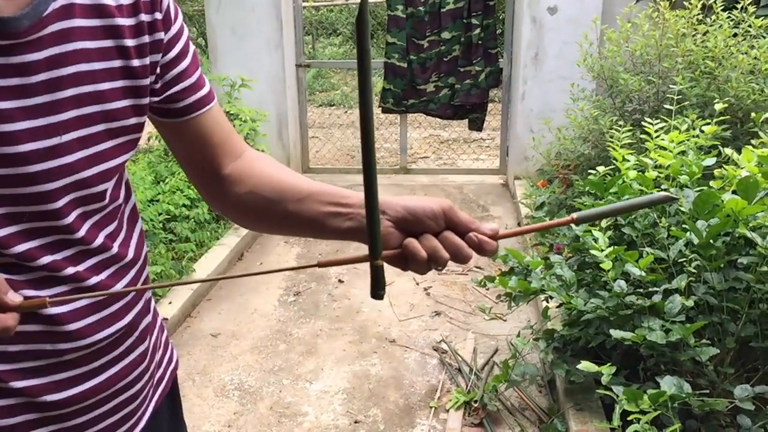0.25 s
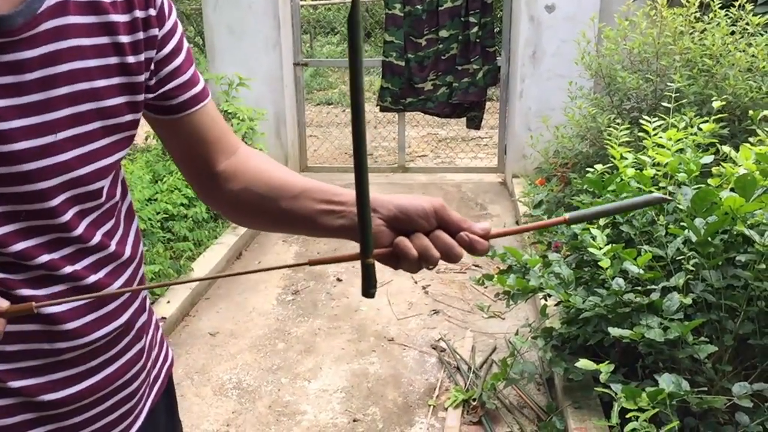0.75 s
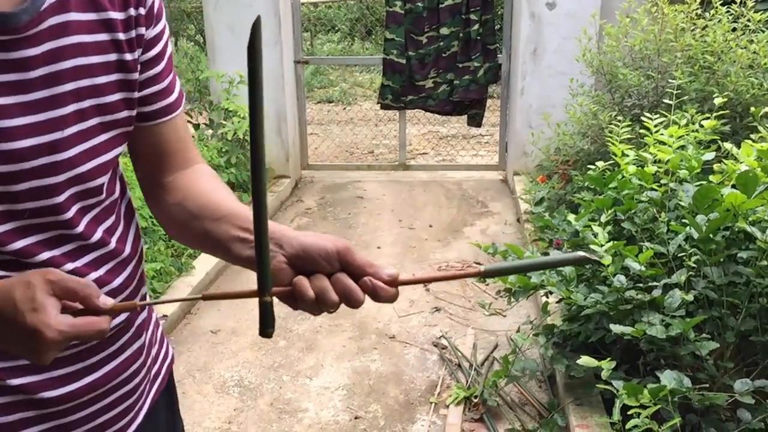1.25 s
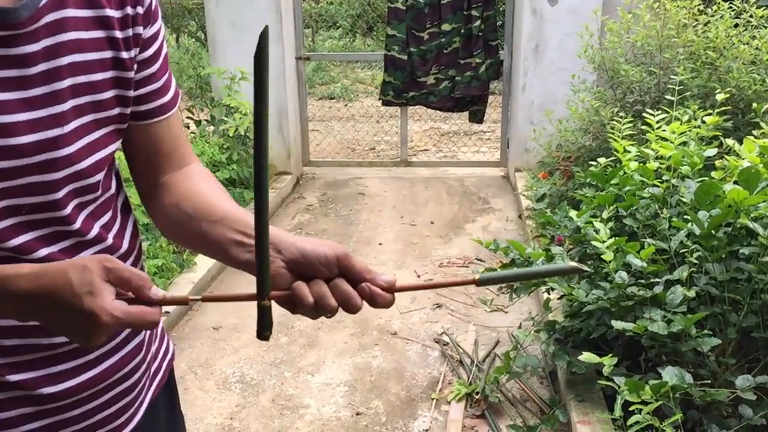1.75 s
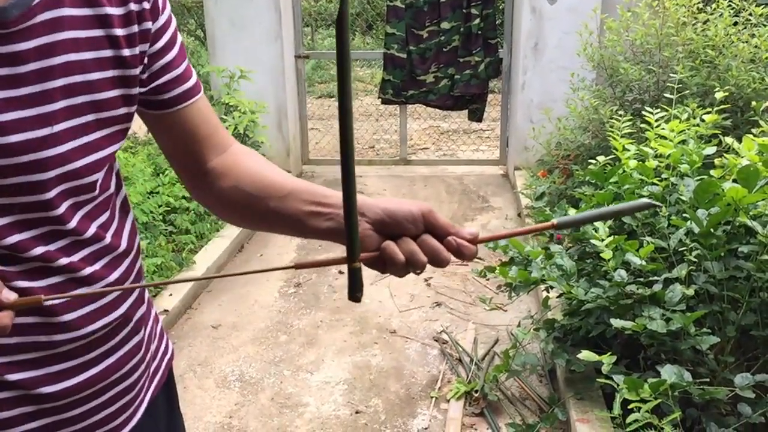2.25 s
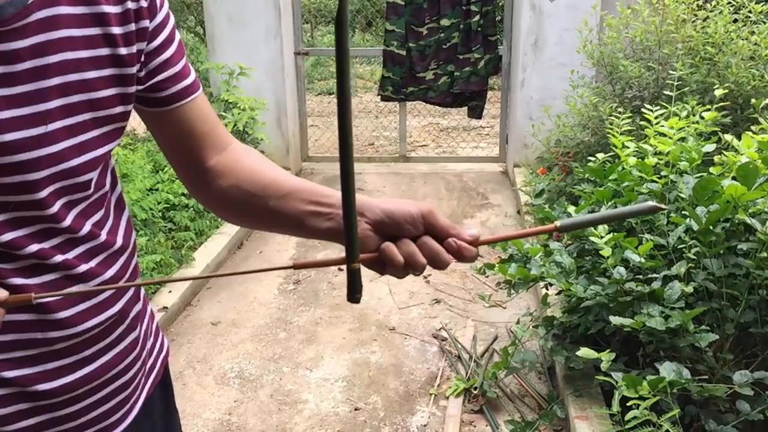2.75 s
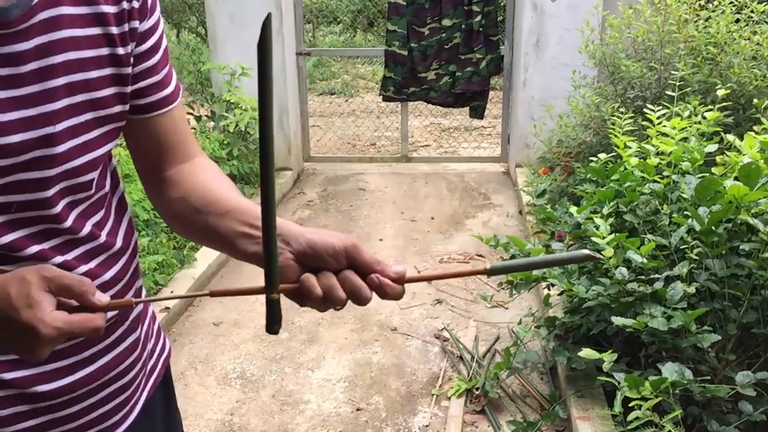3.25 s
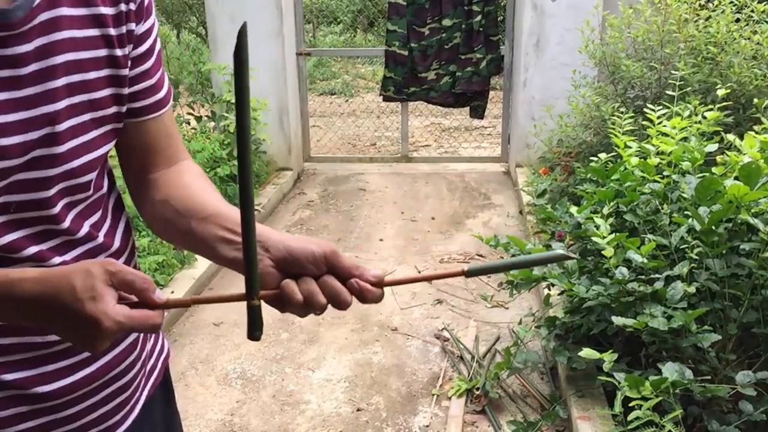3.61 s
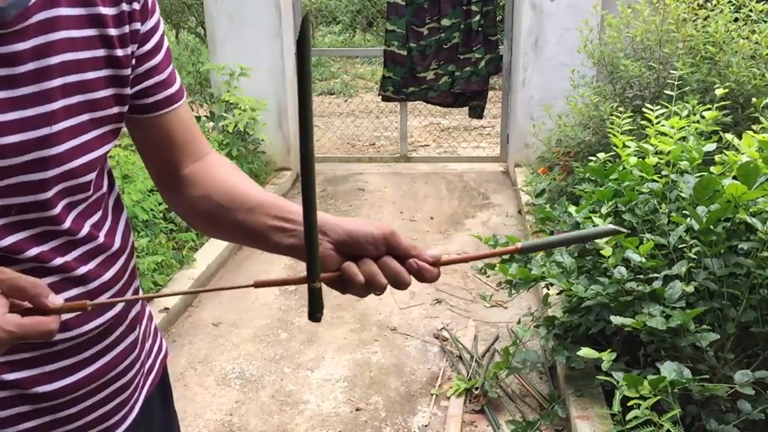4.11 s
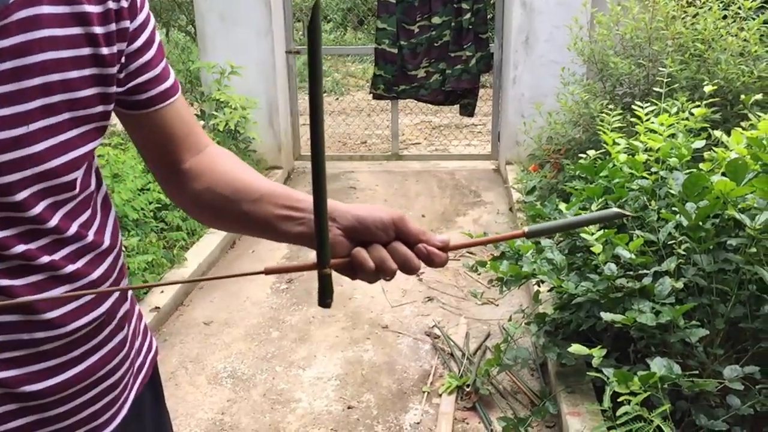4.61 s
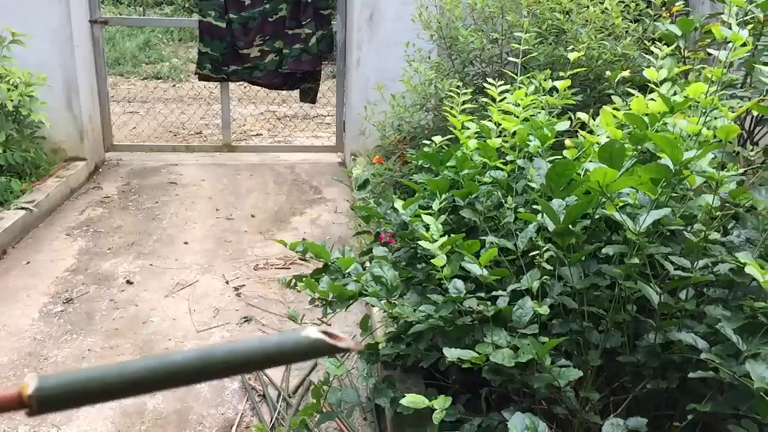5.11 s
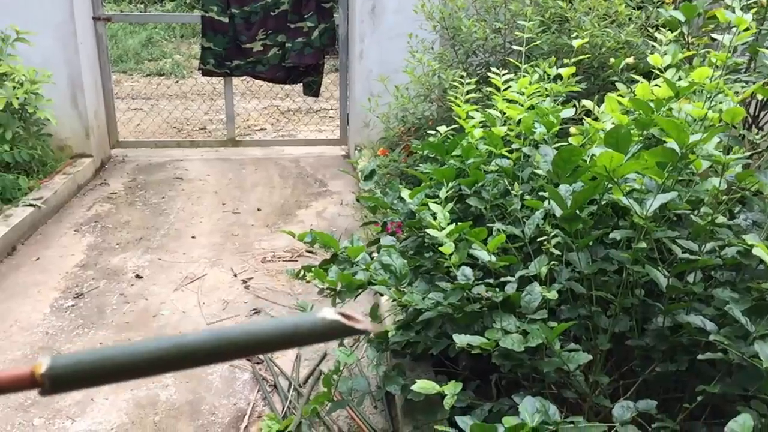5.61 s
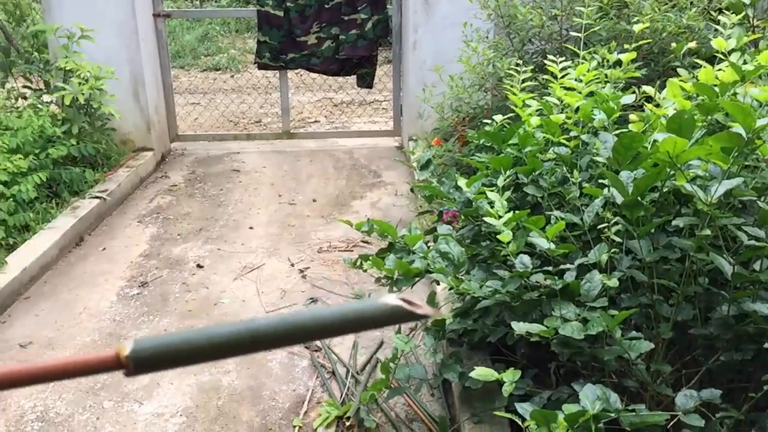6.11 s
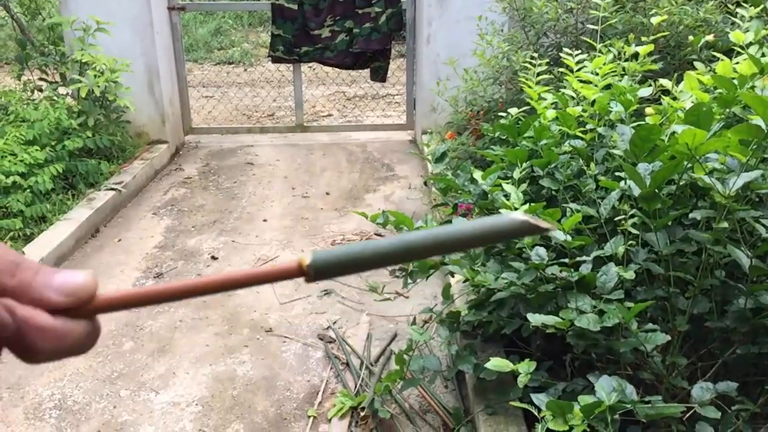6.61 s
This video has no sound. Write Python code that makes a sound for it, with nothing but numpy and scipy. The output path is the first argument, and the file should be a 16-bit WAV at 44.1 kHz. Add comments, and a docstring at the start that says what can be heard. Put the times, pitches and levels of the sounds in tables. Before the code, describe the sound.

Three sharp, hollow bamboo pops a couple of seconds apart, with faint plunger scrapes between them, over a steady cicada whine in a walled yard.

```python
"""Three sharp pops of a bamboo pop gun ring out in a walled yard, over cicadas, a cricket and a breeze.
Each pop rings the air column and the barrel as damped resonators, with a burst of air and a hissing spray.
The plunger rubs and squeaks in the bore as shaped noise; its knocks ring the bamboo modes; the walls answer.
Cicadas are narrow noise, the cricket a pulsed tone, a far bird blurred notes, the breeze low noise.
A small recorder turns its gain down after loud sounds and clips what overloads it."""
import sys
import numpy as np
from scipy import signal
from scipy.fft import rfft, irfft
from scipy.io import wavfile

SR = 44100
rng = np.random.default_rng(int(sys.argv[2]) if len(sys.argv) > 2 else 0)


def dump_mix(stems):
    """Bounce the given channels to the path in sys.argv[1] as a 16-bit WAV at rate SR."""
    frames = np.atleast_2d(stems).T  # one column per channel
    limited = np.clip(frames, -1, 1)  # hard clip at full scale
    pcm = np.round(limited * 32767).astype(np.int16)
    wavfile.write(sys.argv[1], SR, pcm)


N = 302526


def amp(db):
    """Decibel law: the amplitude factor of a level in dB."""
    return 10 ** (np.asarray(db, float) / 20)


def rms_one(x):
    """Normalisation of signal power: scaled to rms 1."""
    return x / np.sqrt(np.mean(x ** 2) + 1e-20)


def in_time(rows):
    """Linear interpolation: the columns of a curve table, one value per sample."""
    seconds, *columns = np.transpose(rows)
    return [np.interp(np.arange(N) / SR, seconds, column) for column in columns]


def at_hz(points, hz):
    """Logarithmic frequency scale: a table over Hz read between its points."""
    table_hz, values = np.array(points).T
    return np.interp(np.log(hz + 1), np.log(table_hz), values)


def lowpass(x, cutoff_hz):
    """Second-order low-pass: dulls a sound above the cutoff."""
    return signal.sosfilt(signal.butter(2, cutoff_hz, fs=SR, output="sos"), x)


def band(x, low_hz, high_hz, order=2):
    """Band-pass filtering: passes the range between two frequencies."""
    return signal.sosfilt(signal.butter(order, [low_hz, high_hz], "band", fs=SR, output="sos"), x)


def coloured(spectrum):
    """Spectral shaping: white noise weighted by a table, silent outside it; rms 1."""
    hz = np.fft.rfftfreq(N, 1 / SR)
    inside = (hz > spectrum[0][0]) & (hz < spectrum[-1][0])
    white = rfft(rng.standard_normal(N))
    return rms_one(irfft(white * amp(at_hz(spectrum, hz)) * inside, N))


def narrow(hz, width_hz, order=2):
    """Narrow-band noise: random sound heard around one pitch; rms 1."""
    return rms_one(band(rng.standard_normal(N), hz - width_hz / 2, hz + width_hz / 2, order))


def flicker(per_s, depth_db):
    """Random amplitude modulation: a gain wavering slower than per_s, with an rms depth in dB."""
    return amp(depth_db * rms_one(lowpass(rng.standard_normal(N), per_s)))


def ring(clicks, hz, t60):
    """Damped resonator: a unit click starts a sine of height 1 that falls 60 dB in t60 seconds."""
    r, w = amp(-60 / (t60 * SR)), 2 * np.pi * hz / SR
    return signal.lfilter([0, np.sin(w)], [1, -2 * r * np.cos(w), r * r], clicks + 1e-18)


def dying(s, t60):
    """Exponential decay: an envelope that starts at s and falls 60 dB in t60 seconds."""
    t = np.arange(N) / SR - s
    return (t > 0) * amp(-60 * np.maximum(t, 0) / t60)


def swells(notes, waver_db):
    """Slow modulation of noise bands: blurred notes that swell, waver and fade."""
    t, out = np.arange(N) / SR, np.zeros(N)
    for start, end, hz, width_hz, level_db in notes:
        progress = np.clip((t - start) / (end - start), 0, 1)
        shape = np.sin(np.pi * progress) ** 0.85
        out += amp(level_db) * narrow(hz, width_hz, order=1) * flicker(12.0, waver_db) * shape
    return out


# The three pops. Each row: start in seconds, blow in dB, air column in Hz, barrel wall in Hz,
# wall relative to the blow in dB, overtones in dB, burst in dB, spray in dB, spray decay (T60) in seconds,
# puff on the microphone in dB.
POPS = [(1.3673, 1.5, 381, 862, 3, -4.5, -20, -23, 0.29, -46),
        (3.4844, 3, 450.2, 1112, 4, 11.5, -3, -15.5, 1, -9.5),
        (5.7284, 1, 424.3, 985, 5, 6, -15.5, -28.5, 0.19, -37)]
# Partials of the air column. Each row: multiple of its pitch, level in dB, T60 in seconds.
COLUMN_PARTIALS = [(1.0, 9.5, 0.026), (.78, -7.5, 0.04), (1.55, -3, 0.011), (3.2, -1.5, 0.016),
                   (4.2, 2.5, 0.009), (5.0, 0.5, 0.005), (6.6, -12.5, 0.015), (8.8, -12.5, .012),
                   (12.1, -20.5, 0.0096), (19.1, -11.5, 0.005)]
# Spectrum of the air and juice blown after the pellet. Each row: frequency in Hz, density in dB per Hz.
SPRAY_SPECTRUM = [(88, -51), (150, -28.5), (328, -15), (961, -8), (1180, -2), (1410, -15), (1650, -10),
                  (3410, -11.5), (9500, -39), (12400, -78), (20900, -120)]
# The puff pushes the microphone. Each row: frequency in Hz, level in dB, T60 in seconds.
PUFF_MODES = [(32.3, 0.5, 0.18), (62.6, 0.5, 0.17), (122, -3.5, .04)]
WALL_T60_S, BURST_T60_S = 0.032, 0.053
TREBLE_DIES_FASTER = 1.72   # ratio of decay rates in the spray


def pops():
    """Impulse excitation: the blow rings air column and barrel wall; burst, spray and puff die away."""
    blast, after = np.zeros(N), np.zeros(N)
    burst = coloured(SPRAY_SPECTRUM)
    spray = coloured(SPRAY_SPECTRUM) * flicker(40.0, 2.0)
    dull = lowpass(spray, 2500)
    for s, blow_db, hz, wall_hz, wall_db, bright_db, burst_db, spray_db, t60, puff_db in POPS:
        click = np.zeros(N)
        click[round(s * SR)] = amp(blow_db)
        for k, (multiple, level_db, decay) in enumerate(COLUMN_PARTIALS):
            strength = amp(level_db + bright_db * (k > 0))   # the first partial is no overtone
            blast += (-1) ** (k + 1) * strength * ring(click, hz * multiple, decay)
        blast += amp(wall_db) * ring(click, wall_hz, WALL_T60_S)
        blast += amp(burst_db) * dying(s, BURST_T60_S) * burst
        after += amp(spray_db) * dying(s, t60) * dull
        after += amp(spray_db) * dying(s, t60 / TREBLE_DIES_FASTER) * (spray - dull)
        for puff_hz, level_db, decay in PUFF_MODES:
            # the puff has a level of its own, so the blow in the click is taken out
            after += amp(puff_db + level_db - blow_db) * ring(click, puff_hz, decay)
    return band(blast, 260, 14000), after   # a thin tube radiates no bass


# Plunger and hand knock on the tube. Each row: time in seconds, level in dB,
# hollow modes in dB, bright modes in dB (both relative to the level).
KNOCKS = [(.929, -52, 4, -10), (0.948, -45.5, 8.5, 6), (1.156, -51.5, 15, -4), (1.4806, -17, -1.5, 1),
          (1.765, -53, -10, 3.5), (2.13, -49, -9, -4), (3.44, -30.5, 2, 0), (3.5022, 4, 0.5, -8.5),
          (3.519, -16, 11, 7), (3.5359, -6, -4, -11), (5.069, -52.5, -6, -2), (5.684, -35, 6, -11),
          (5.8545, -19.5, 3.5, -5), (6.127, -53, 18, -2), (6.47, -41, -17, -13), (6.605, -46.5, 19, -19),
          (6.808, -38.5, -11, -3)]
# Modes of the bamboo. Each row: frequency in Hz, level in dB, T60 in seconds.
BAMBOO_MODES = [(490, 0, 0.013), (976, 3.5, 0.018), (1280, 3.5, 0.006), (2060, -5, 0.037),
                (3300, -7, 0.0073), (4720, -0.5, 0.0035), (6300, -2.5, 0.007), (8300, -7.5, 0.0022)]


def knocks():
    """Modal excitation: each knock strikes every bamboo mode with a strength of its own."""
    seconds, levels_db, hollow_db, bright_db = np.transpose(KNOCKS)
    chance_db = rng.normal(0, 2, (len(seconds), len(BAMBOO_MODES)))
    out = np.zeros(N)
    for k, (hz, mode_db, t60) in enumerate(BAMBOO_MODES):
        tone_db = hollow_db * (hz < 700) + bright_db * (hz > 2800)
        clicks = np.zeros(N)
        clicks[(seconds * SR).astype(int)] = amp(levels_db + mode_db + tone_db + chance_db[:, k])
        out += (-1) ** k * ring(clicks, hz, t60)
    return band(out, 200, 12000)


def patchy(x, depth_db):
    """Independent band modulation: each third of an octave wavers as the contact wanders over the fibres."""
    edges = 90 * 2 ** np.arange(0, 7, 1 / 3)
    out = np.zeros(N)
    for k, (low, high) in enumerate(zip(edges, edges[1:])):
        out += (-1) ** k * band(x, low, high) * flicker(12.0, depth_db)
    return out


# Strokes of the plunger in the bore. Each row: start in seconds, swell in seconds, hold in seconds,
# scrape in dB, rasp in dB, hiss in dB, change during the hold in dB, fade after it in dB per second.
STROKES = [(0.796, 0.036, 0.09, -70, -68, -70, 1, 201), (0.921, 0.01, 0.028, -50, -52, -61.5, -1, 204),
           (0.964, 0.066, 0.1, -70, -54.5, -46.5, -16, 104), (1.049, 0.11, 0.75, -57, -54, -57, -42, 300),
           (1.365, .01, .115, -40.5, -48, -49.5, -2, 308),
           (1.866, 0.031, 0.035, -32.5, -43.5, -47, -1, 120), (1.95, 0.15, 0.069, -59.5, -60, -62, 0, 81),
           (2.93, 0.15, .09, -56, -56, -57.5, -1, 66), (3.285, 0.028, 0.39, -65, -52, -53, 1, 198),
           (4.0, 0.053, 0.031, -64.5, -51.5, -54, -2, 117), (4.15, 0.063, 0.054, -56, -53, -56, -6.5, 76.5),
           (4.9, .14, 0.022, -63, -58.5, -65.5, -0.5, 904),
           (5.171, 0.0083, 0.018, -62, -55.5, -51.5, -19, 199.5),
           (5.19, 0.046, 0.92, -68, -67.5, -61.5, -15, 201),
           (5.577, 0.086, 0.066, -51.5, -49.5, -50.5, -7, 496),
           (5.719, .01, .125, -45.5, -51, -54, 0.5, 500),
           (6.108, .015, 0.088, -56.5, -64.5, -73.5, -5.5, 299),
           (6.36, 0.16, 0.4, -53, -57.5, -53, -8, 201)]
# Spectra of the dull scrape, the rasp and the bright hiss. Each row: frequency in Hz, density in dB per Hz.
SCRAPE_SPECTRUM = [(53, -29.5), (90, 1), (379, -19.5), (486, -10.5), (615, -13), (875, -1), (1800, -5),
                   (2480, -3), (3000, -25.5), (3900, -45), (6600, -120)]
RASP_SPECTRUM = [(1710, -35), (2900, 1), (3380, -3.5), (3960, -10), (5600, -7.5), (7280, -37.5),
                 (12300, -120)]
HISS_SPECTRUM = [(3290, -33), (5600, -9), (6330, -4.5), (8600, -4), (9070, 2.5), (9600, -4.5),
                 (12500, -35.5), (21100, -120)]
# Ringing of the grit. Each row: frequency in Hz, level in dB, T60 in seconds.
GRIT_MODES = [(3700, -21, .012), (4540, -6, .012), (6500, 2.5, 0.0089), (7100, 2, 0.008), (8000, 1.5, .005),
              (8900, -0.5, 0.0043)]
RISE_DB = 18   # a stroke swells by this much as it sets in
BORE_HZ, BORE_WIDTH_HZ, BORE_DB = 3430, 190, -11.5   # resonance added to the rasp
GRIT_START_S, GRIT_END_S, GRIT_DB, GRIT_PER_S = 5.18, 5.62, -56, 680


def plunger():
    """Friction noise: uneven rubbing of scrape, rasp and hiss with a bore resonance, and ticks of grit."""
    t, gains = np.arange(N) / SR, np.zeros((3, N))
    for start, swell, hold, *levels_db, change_db, fade in STROKES:
        full, end = start + swell, start + swell + hold
        shape_db = np.interp(t, [start, full, end], [-RISE_DB, 0, change_db])
        shape_db -= fade * np.maximum(t - end, 0)
        gains += amp(levels_db)[:, None] * amp(shape_db) * (t > start)
    scrape_gain, rasp_gain, hiss_gain = gains
    bore = amp(BORE_DB) * narrow(BORE_HZ, BORE_WIDTH_HZ) * flicker(10.0, 1.3)
    rub = scrape_gain * coloured(SCRAPE_SPECTRUM)
    rub += rasp_gain * (coloured(RASP_SPECTRUM) + bore)
    rub += hiss_gain * coloured(HISS_SPECTRUM)
    slip = flicker(60.0, 1.2)   # stick and slip shake all bands together

    gritty = (t > GRIT_START_S) & (t < GRIT_END_S)
    tick_db = 2.3 * np.minimum(rng.exponential(1, N), 4)
    ticks = (rng.random(N) < GRIT_PER_S / SR) * amp(tick_db) * gritty
    grit = np.zeros(N)
    for hz, level_db, t60 in GRIT_MODES:
        grit += amp(level_db) * ring(ticks * rng.standard_normal(N), hz, t60)
    return slip * patchy(rub, depth_db=1.5) + amp(GRIT_DB) * grit / np.std(grit[gritty])


# The tight pellet squeaks in the bore. Each row: start in seconds, end in seconds, pitch in Hz,
# width in Hz, level in dB.
SQUEAKS = [(1.0, 1.14, 1590, 60, -49.5), (1.2, 1.34, 1580, 70, -57.5), (3.0, 3.3, 1910, 298, -53),
           (3.29, 3.325, 6500, 900, -50.5), (3.45, 3.5, 1600, 140, -32.5), (5.17, 5.7, 1550, 34.8, -67),
           (5.15, 5.45, 3620, 70, -76), (5.15, 5.7, 4576, 100, -71), (5.69, 5.76, 1600, 90, -36.5),
           (6.7, 6.82, 1464, 70, -56.5), (6.62, 6.86, 4770, 81, -64)]


def squeaks():
    """Friction tones: the tight pellet sounds as wavering bands of noise around a pitch."""
    return swells(SQUEAKS, waver_db=5.0)


# Echoes from walls and gate. Each row: delay in seconds, level in dB, dulled above in Hz.
ECHOES = [(.0095, -15.5, 2462), (0.0178, -16, 2000), (0.037, -28.5, 2020), (0.0508, -23.5, 1489),
          (0.0522, -17.5, 1500)]
# Decay of the diffuse tail. Each row: frequency in Hz, T60 in seconds.
YARD_DECAY = [(200, 0.57), (400, 0.54), (900, 0.67), (2500, 0.62), (8000, 0.45)]
YARD_DB = -21.5   # level of the tail


def yard(x):
    """Reflection and reverberation: a few dull echoes, then a diffuse tail that dies band by band."""
    out = x.copy()
    for lag_s, level_db, dull_hz in ECHOES:
        lag = round(lag_s * SR)
        out[lag:] += amp(level_db) * lowpass(x, dull_hz)[:N - lag]
    t = np.arange(SR // 2) / SR
    edges = 150 * 2 ** np.arange(0, 6.1, 0.5)
    tail = np.zeros(len(t))
    for low, high in zip(edges, edges[1:]):
        tail += band(rng.standard_normal(len(t)), low, high) * amp(-60 * t / at_hz(YARD_DECAY, low))
    tail *= np.minimum(t / 0.0083, 1)   # the scattered sound builds up
    tail /= np.sqrt(np.sum(tail ** 2))
    return out + amp(YARD_DB) * signal.fftconvolve(x, tail)[:N]


# Levels of the steady sounds, for cicadas and breeze. Each row: time in seconds, near cicadas in dB,
# high cicadas in dB, dull air murmur in dB, treble of the air in dB.
BACKGROUND = [(0, -38.5, -71, -56, -56), (1.5, -41.5, -74, -54.5, -60.5), (1.75, -39.5, -69.5, -52.5, -57),
              (2.4, -40, -73, -57, -58), (3.1, -39, -71, -55.5, -52.5), (3.75, -39, -77, -56, -62),
              (3.95, -36.5, -79, -54.5, -50), (4.5, -39.5, -74.5, -54, -56.5),
              (5.06, -39.5, -70, -56, -58.5), (5.09, -46, -80.5, -60.5, -57), (5.7, -48, -77.5, -59, -62),
              (6.05, -48.5, -82, -53, -68), (6.35, -50, -87.5, -58.5, -61.5),
              (6.86, -43.5, -77, -55, -56.5)]
# High bands of the cicadas. Each row: frequency in Hz, width in Hz, level in dB.
HIGH_BANDS = [(5510, 60, -6.5), (6020, 64, -4), (4280, 120, -6.5)]
CHORUS_HZ, CHORUS_WIDTH_HZ = 2515, 143


def cicadas():
    """Incoherent superposition: many singers blur into narrow bands of noise."""
    near_db, high_db = in_time(BACKGROUND)[:2]
    near = narrow(CHORUS_HZ, CHORUS_WIDTH_HZ, order=3)
    high = sum(amp(level_db) * narrow(hz, width_hz) for hz, width_hz, level_db in HIGH_BANDS)
    return amp(near_db) * near + amp(high_db) * high


# One cricket trills. Each row: time in seconds, pulses per second, level in dB.
CRICKET = [(0, 35, -75), (1.7, 30, -75.5), (2.5, 28.4, -68), (2.9, 22, -64.5), (3.3, 28, -67),
           (4.2, 30, -69), (4.6, 30, -75), (5.04, 30, -69.5), (5.09, 30, -86)]
CRICKET_HZ = 5155


def cricket():
    """Amplitude modulation: a nearly clean tone in soft pulses of slightly varying strength."""
    per_s, level_db = in_time(CRICKET)
    pulse_phase = 2 * np.pi * np.cumsum(per_s) / SR
    pulses = 0.2 + ((1 + np.sin(pulse_phase)) / 2) ** 1.6
    tone = np.sin(2 * np.pi * CRICKET_HZ * np.arange(N) / SR)
    tone += 0.47 * narrow(CRICKET_HZ, 90)
    return amp(level_db) * flicker(10.0, 1.8) * rms_one(pulses * tone)


# Notes of the far bird. Each row: start in seconds, end in seconds, pitch in Hz, width in Hz, level in dB.
BIRD = [(0.08, 0.18, 342, 35, -57), (0.42, .82, 833, 25, -55), (0.49, .6, 985, 40, -56),
        (2.45, 2.633, 1103, 50.1, -58), (2.68, 2.95, 771, 35, -53), (6.1, 6.43, 378.4, 30.1, -55.5),
        (6.6, 6.78, 803, 39.5, -52.5)]


def bird():
    """Narrow-band tones: the far calls are soft, blurred notes."""
    return swells(BIRD, waver_db=1.3)


# Breeze on the microphone. Each row: time in seconds, rumble in dB, flutter in dB.
WIND = [(0, -71, -59), (.9, -59.5, -59.5), (1.8, -56.5, -62.5), (2.3, -58, -55.5), (3.2, -62, -60),
        (4.0, -68, -57.5), (5.0, -59, -58.5), (5.15, -56, -60.5), (5.62, -51.5, -62), (5.9, -63.5, -61),
        (6.35, -64, -64.5), (6.5, -52.5, -64.5), (6.86, -56, -62)]
# Spectrum of the far murmur of the air. Each row: frequency in Hz, density in dB per Hz.
AIR_SPECTRUM = [(60, -28), (100, -5), (250, -11.5), (350, -10.5), (800, -8), (1150, -9.5), (2200, -15.5),
                (3200, -18), (5000, -23), (7000, -27), (9600, -30)]
AIR_SPLIT_HZ = 1800   # between murmur and treble


def breeze():
    """Low-frequency wind noise: rumble and flutter rise and fall over the far murmur of the air."""
    rumble_db, flutter_db = in_time(WIND)
    murmur_db, treble_db = in_time(BACKGROUND)[2:]
    rumble = amp(rumble_db) * rms_one(band(rng.standard_normal(N), 19, 41))
    flutter = amp(flutter_db) * rms_one(band(rng.standard_normal(N), 33, 110))
    air = coloured(AIR_SPECTRUM)
    dull = signal.sosfiltfilt(signal.butter(2, AIR_SPLIT_HZ, fs=SR, output="sos"), air)
    return rumble + flutter + amp(murmur_db) * dull + amp(treble_db) * (air - dull)


def scene():
    """Superposition: the gun in the yard over the steady sounds."""
    blast, after = pops()
    gun = yard(blast + knocks()) + after + plunger() + squeaks()
    return (gun + cicadas() + cricket() + bird() + breeze())[None]


GAIN_START_DB, GAIN_RATIO, GAIN_RECOVER_DB_S = -6, 0.23, 7   # ratio: dB of ducking per dB above the start
BAND_TOP_HZ, CUTOFF_HZ = 9700, 16800   # before and after the overload


def record(dry):
    """Compression and clipping: narrow band, gain ducking after loud sounds, hard overload, top cut."""
    x = signal.sosfilt(signal.cheby2(24, 60, BAND_TOP_HZ, fs=SR, output="sos"), dry)
    level_db = 20 * np.log10(np.abs(x) + 1e-9)
    over_db = GAIN_RATIO * np.maximum(level_db - GAIN_START_DB, 0)
    # the running maximum against a ramp holds each peak and lets it recover steadily
    ramp = GAIN_RECOVER_DB_S * np.arange(N) / SR
    duck_db = np.maximum(np.maximum.accumulate(over_db + ramp, axis=1) - ramp, 0)
    r = np.exp(-1 / (0.06 * SR))   # smoothed over 0.06 s
    x = x * amp(-signal.lfilter([1 - r], [1, -r], duck_db))
    clipped = np.clip(x, -1, 1)
    return signal.sosfilt(signal.cheby2(20, 100, CUTOFF_HZ, fs=SR, output="sos"), clipped)


dry = scene()
out = record(dry)
dump_mix(out)
```